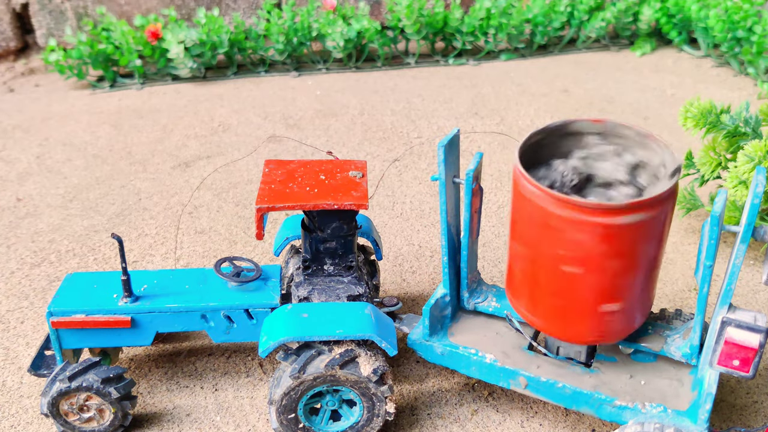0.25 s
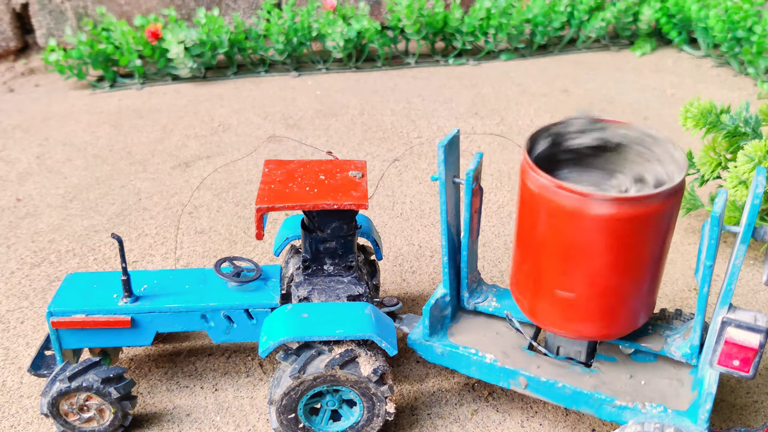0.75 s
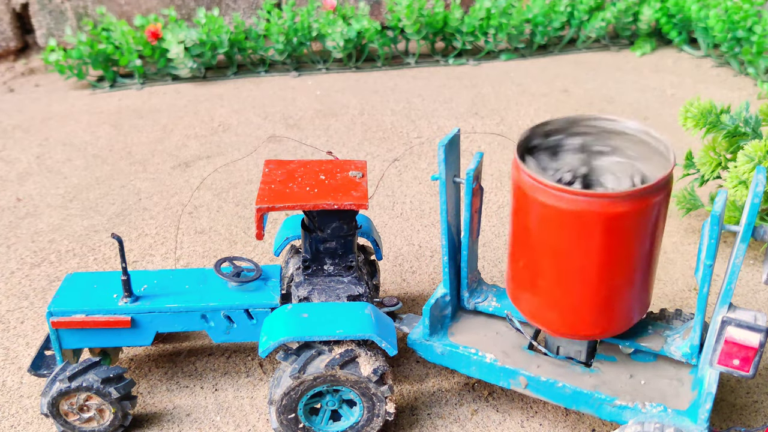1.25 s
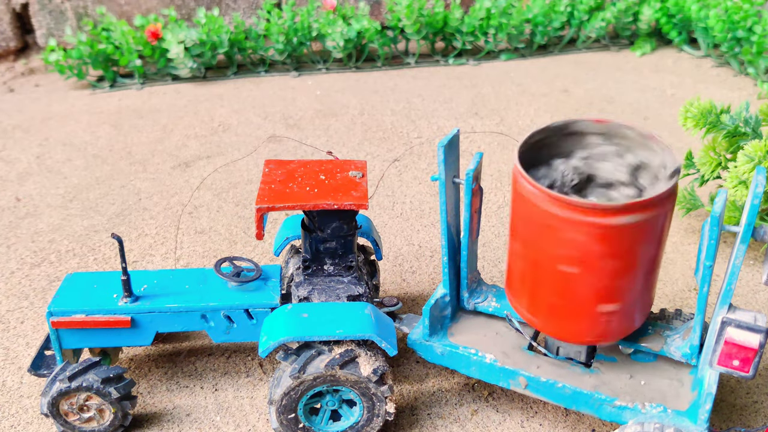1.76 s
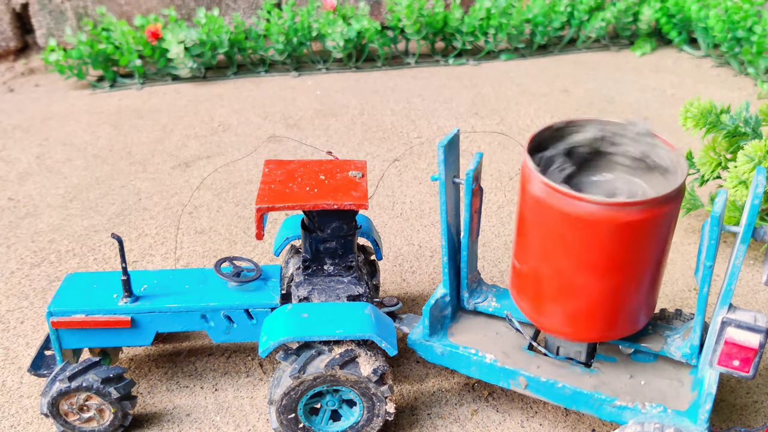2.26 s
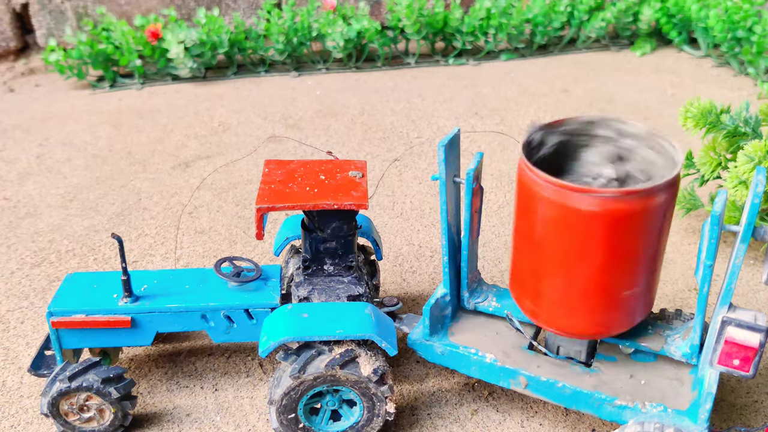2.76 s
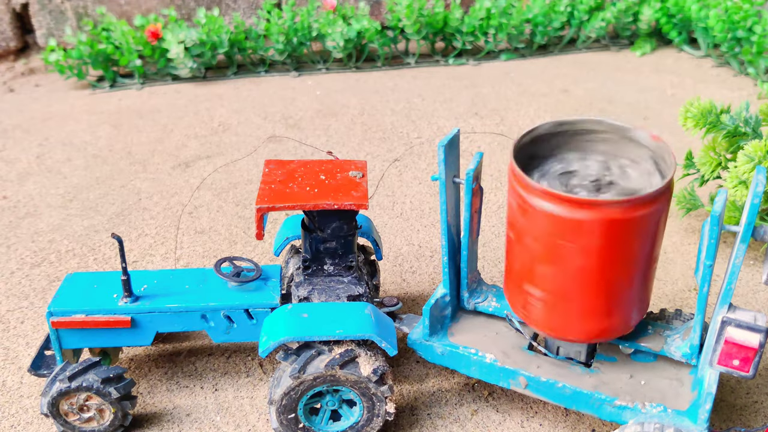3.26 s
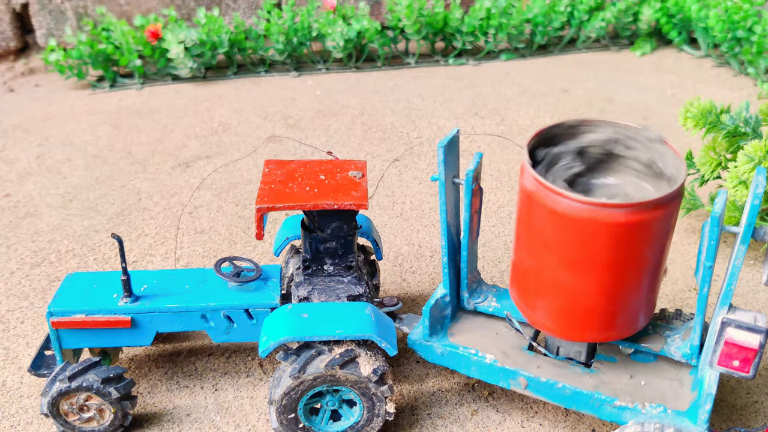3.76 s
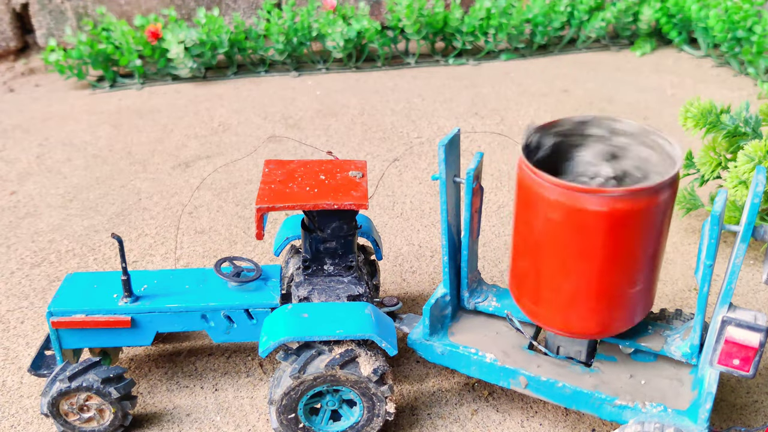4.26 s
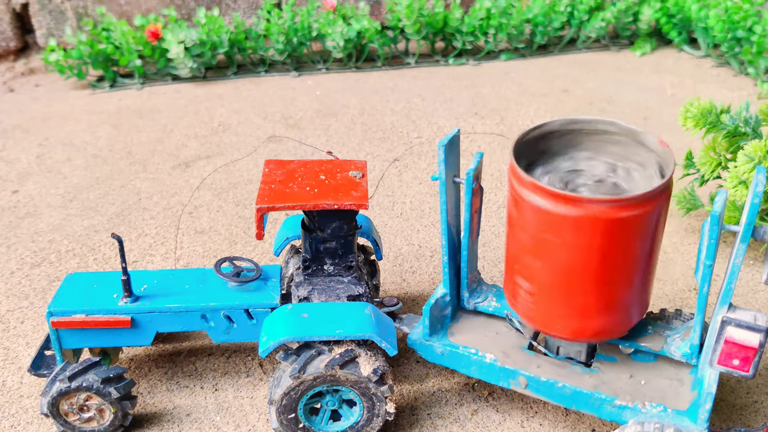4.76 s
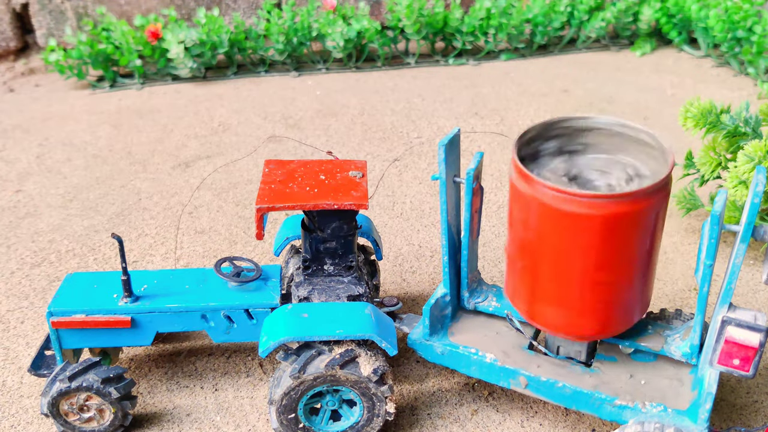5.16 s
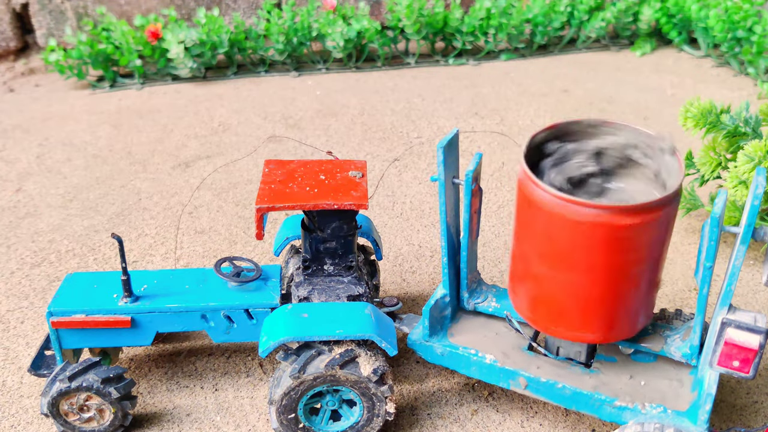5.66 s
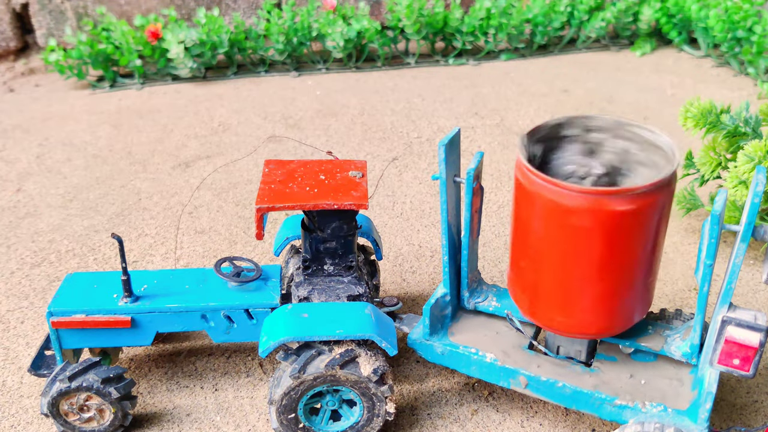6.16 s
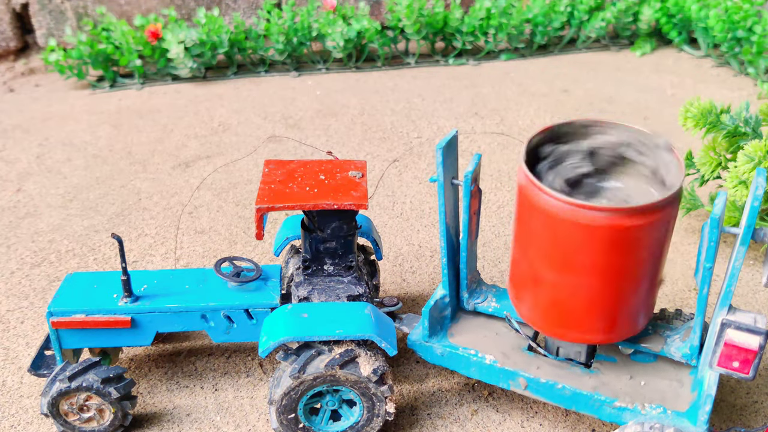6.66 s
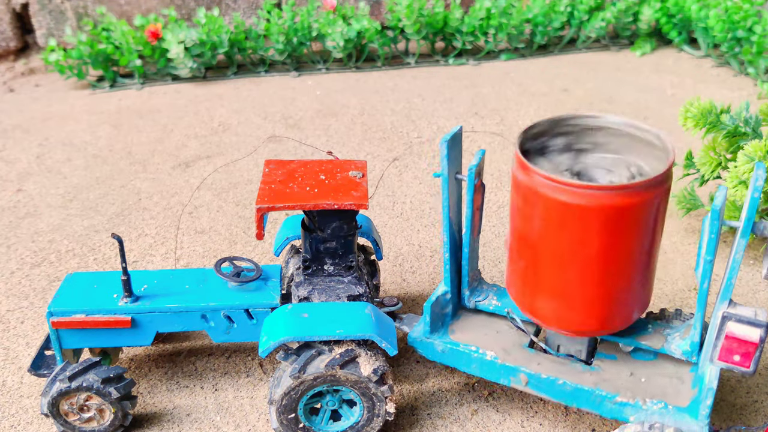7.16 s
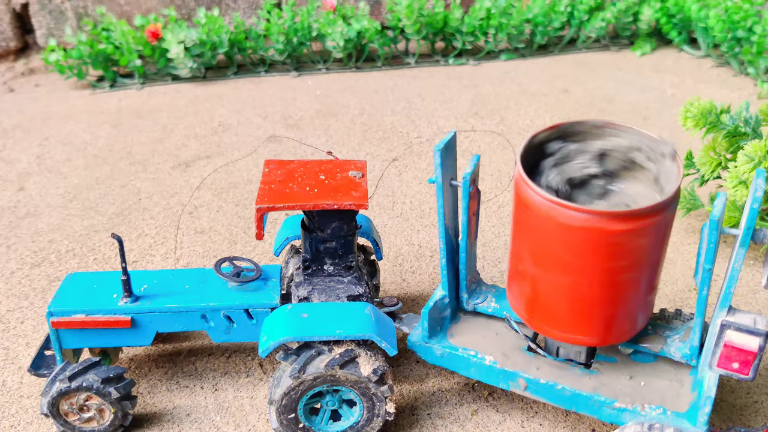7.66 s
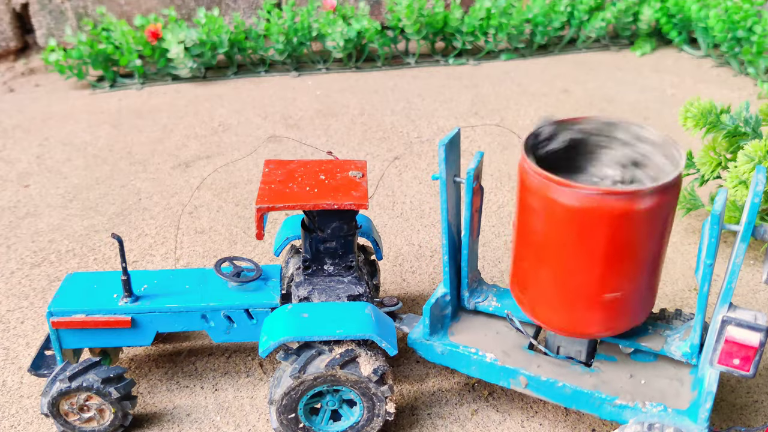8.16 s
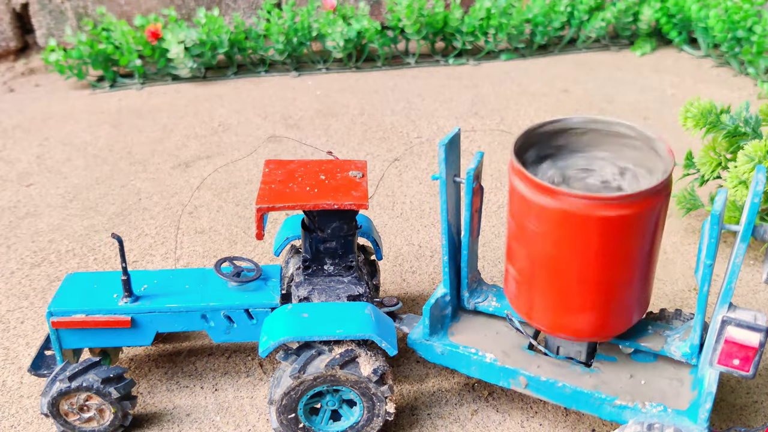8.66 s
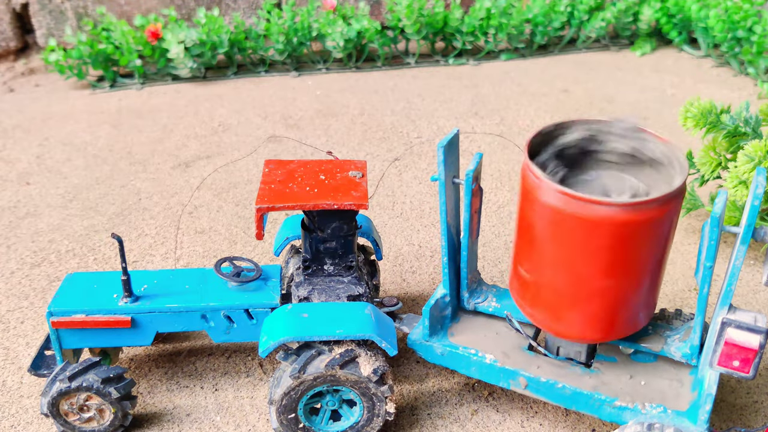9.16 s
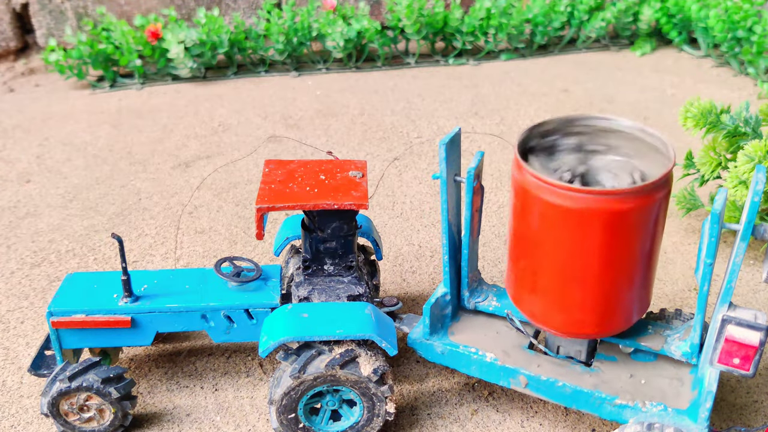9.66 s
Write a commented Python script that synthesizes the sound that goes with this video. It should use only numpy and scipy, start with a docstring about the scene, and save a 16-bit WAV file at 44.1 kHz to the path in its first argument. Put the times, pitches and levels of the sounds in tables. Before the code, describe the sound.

Continuous fast clatter from a small motor-driven metal drum carrying wet concrete. Low knocks come in a lopsided, nearly regular rhythm, with hollow clanks and gear ticks between them, over rough noisy grinding and a low frame shudder. Occasional dry slaps and tiny grit ticks stand out. The opening is loud and slightly overloaded, then the rattle eases a little and keeps going. Close, dry, outdoor sound with dulled treble.

```python
"""Outdoors on sand, a miniature concrete mixer runs close to one microphone.
Its heavy drum wobbles on a loose drive: about six times a second it drops on the frame, bounces,
swings back and settles. Each blow is a short noisy force that excites the resonant modes of the parts.
The small motor and the wet mix grind as modulated noise, the frame rocks as low narrow-band noise,
pebbles and sand tick on the rim, the top is dull, and the hardest blows overload the recorder."""
import sys
import numpy as np
from scipy.fft import rfft, irfft, next_fast_len
from scipy.io import wavfile
from scipy.ndimage import uniform_filter1d, map_coordinates

SR = 44100
rng = np.random.default_rng(int(sys.argv[2]) if len(sys.argv) > 2 else 0)


def log_audio(samples):
    """Write samples as a 16-bit WAV file to the path given in sys.argv[1]."""
    # one column per channel
    frames = np.atleast_2d(samples).T
    # limit to full scale, then quantise
    limited = np.clip(frames, -1, 1)
    pcm = np.round(limited * 32767).astype(np.int16)
    wavfile.write(sys.argv[1], SR, pcm)


N = 437472  # length [samples]

# Once in each wobble the drum drops on its axle:
# (time [s], frame thud level [dB], axle crack level [dB])
DROPS = [(0.0467, -19, -17), (0.1945, -22, -24.5), (0.3467, -18, -21.5), (0.5075, -19, -20),
         (0.665, -11.5, -15), (0.818, -12.0, -16.0), (0.9727, -15, -19.5), (1.1345, -15, -14.5),
         (1.2934, -15.5, -23), (1.4524, -23, -26.5), (1.622, -11, -14), (1.7755, -23, -23),
         (1.9451, -12.5, -19), (2.1046, -15.5, -17.5), (2.2609, -16, -20), (2.4199, -17, -17),
         (2.5818, -17, -18), (2.739, -15.5, -22.0), (2.9057, -19.0, -21.5), (3.0742, -16, -26.0),
         (3.248, -17.5, -19.5), (3.4175, -20.5, -22.5), (3.5874, -20.5, -28.5), (3.765, -15, -19.5),
         (3.929, -20, -23), (4.0961, -30.5, -23), (4.2653, -21.5, -28), (4.4292, -16, -22.5),
         (4.5904, -25.5, -28), (4.755, -27, -26), (4.9238, -18.5, -24), (5.0813, -24, -25.5),
         (5.246, -33, -34), (5.412, -17.5, -22.5), (5.5624, -21, -22), (5.7221, -24, -21.5),
         (5.8838, -17, -20), (6.0397, -19.5, -21.5), (6.202, -14.5, -12), (6.3636, -18, -24),
         (6.5251, -17.5, -15.5), (6.6846, -20.5, -21.0), (6.851, -21, -23.5), (7.0106, -16, -25),
         (7.171, -24, -27), (7.3324, -24, -28.5), (7.4958, -21, -29), (7.6527, -27, -25.0),
         (7.8206, -16.0, -25.5), (7.9735, -26, -23.5), (8.1398, -22.5, -19), (8.2999, -17, -24),
         (8.4601, -19, -21), (8.6151, -28.5, -23), (8.7777, -22, -23), (8.9373, -18.0, -19.5),
         (9.0939, -22, -22.0), (9.256, -17.0, -16), (9.4133, -22, -19.5), (9.5714, -21, -44),
         (9.73, -22, -30), (9.893, -15.0, -17)]
# Bounces, back swing and settling after every drop, with the levels for an average drop:
# (delay [s], scatter of the delay [s], frame thud level [dB], drum clank level [dB], gear tick level [dB])
BOUNCES = [(0.017, 0.002, -22, -31.5, -32), (0.03, 0.0042, -28.5, -29.5, -28.5),
           (0.064, 0.004, -30.5, -28.5, -31.5), (0.077, 0.004, -26, -31, -32),
           (0.1, 0.005, -35, -34, -32.5)]
# Single clanks between drum and drive, loud and moderate, each at its own time:
# (time [s], frame thud level [dB], drum clank level [dB], gear tick level [dB])
SINGLE_CLANKS = [(0.118, -20.5, -21, -24), (0.267, -21, -22, -28), (0.378, -33, -24.5, -23.5),
                 (0.411, -17, -23, -45), (0.42, -22, -18, -15.5), (0.432, -32, -25, -21),
                 (0.5253, -25, -21, -20.5), (0.679, -18, -19, -20.0), (0.727, -27, -14.5, -11.5),
                 (0.835, -25, -18.5, -15), (0.889, -14, -10.0, -18.5), (0.928, -22, -22.5, -19),
                 (0.993, -24, -22.5, -26.5), (1.0044, -31.0, -25, -24.0), (1.046, -14.5, -10.5, -15.5),
                 (1.055, -27, -41, -22), (1.076, -33.0, -24, -23.0), (1.154, -24, -21.5, -9.5),
                 (1.207, -22, -18, -16.0), (1.234, -22, -29, -30.5), (1.31, -34, -21.5, -28),
                 (1.357, -20, -18, -29), (1.391, -36.5, -31, -20), (1.3989, -41, -45, -21),
                 (1.529, -25, -19, -25.0), (1.638, -24.5, -20, -14.5), (1.695, -25, -13.5, -24.5),
                 (1.728, -19, -20.5, -17.5), (1.851, -20, -21, -23), (1.961, -31, -21, -21),
                 (2.123, -23, -17, -13), (2.138, -24, -29.0, -20.5), (2.189, -26, -25, -24),
                 (2.2055, -21, -18, -19), (2.278, -23, -21, -18), (2.333, -18.5, -17, -20),
                 (2.348, -28, -23.5, -19), (2.4514, -26, -26, -20), (2.499, -20, -16, -22.5),
                 (2.528, -24.0, -21.5, -22), (2.599, -18, -20, -12.5), (2.659, -13.5, -22, -14.5),
                 (2.6732, -34.0, -30, -19), (2.7677, -30, -24.5, -21.0), (2.82, -16.5, -19, -32),
                 (2.859, -19, -19, -15.0), (2.924, -24, -20, -24), (3.005, -22.5, -22, -20.5),
                 (3.089, -28.5, -22, -23.5), (3.268, -19.5, -21, -13.5), (3.327, -18, -17, -13),
                 (3.439, -23, -25, -17), (3.711, -21, -23, -28.5), (3.833, -21, -25.5, -19.5),
                 (3.8461, -35.5, -32, -23.5), (3.9595, -27, -28.5, -23.0), (4.213, -50, -44.0, -26),
                 (4.4576, -25, -23, -23.5), (4.504, -20.5, -21, -24), (4.6525, -29, -22, -32.0),
                 (4.669, -26, -22.5, -26.5), (4.854, -33, -27, -18.0), (4.952, -29.0, -25.0, -23.5),
                 (4.981, -30, -23, -29), (4.997, -26.0, -16.5, -23), (5.011, -34, -39, -18.5),
                 (5.11, -28, -30, -23.5), (5.1595, -21, -28, -22), (5.174, -37.0, -25.5, -18.5),
                 (5.331, -25, -23, -20.5), (5.3466, -22, -31, -23.0), (5.43, -17.5, -23.0, -17),
                 (5.446, -30.0, -24, -19.5), (5.651, -23, -29, -17.0), (5.799, -18, -19, -19),
                 (5.813, -34, -32, -17.0), (5.915, -24, -21, -18.0), (5.982, -21.5, -24.5, -24.5),
                 (6.117, -16, -18, -16.5), (6.217, -28.5, -23, -13), (6.2322, -22.5, -38.5, -25),
                 (6.277, -24, -17, -23), (6.392, -22, -29, -20.5), (6.546, -31, -23, -19.5),
                 (6.5582, -27, -25, -23), (6.723, -30, -24, -15.5), (6.7736, -30.5, -24.5, -29.5),
                 (6.872, -19, -18, -13), (7.027, -23, -19.5, -12.5), (7.1008, -34.0, -22, -26),
                 (7.112, -20.0, -20.0, -23.0), (7.289, -20, -21.5, -23), (7.834, -24, -23, -22.5),
                 (7.887, -21.5, -20.5, -29.5), (8.16, -27, -19, -14.5), (8.171, -22, -19, -11.5),
                 (8.327, -27, -26, -23.5), (8.478, -27, -20.5, -24), (8.491, -31, -27, -19.5),
                 (8.518, -27, -19.5, -16.5), (8.68, -36, -20, -24.5), (8.7954, -30, -22.0, -25),
                 (8.808, -27, -28, -22.5), (8.832, -28, -26, -25), (8.956, -26.5, -23, -26.0),
                 (8.967, -32, -19, -24.0), (9.0064, -29, -26, -25), (9.0325, -24.5, -22, -28),
                 (9.074, -34, -42, -24.5), (9.123, -25.5, -20.5, -17.5), (9.1606, -34.5, -32.0, -26),
                 (9.2749, -23.5, -23.5, -20.5), (9.359, -28, -28, -24.5), (9.444, -19, -29, -16.5),
                 (9.615, -36, -24, -37), (9.651, -32.5, -23.5, -20.0), (9.6666, -33, -22.5, -27.0),
                 (9.75, -44, -29, -17.0), (9.809, -30, -28, -23.5), (9.836, -43, -19.5, -25.5)]
# A loose bracket slaps: (time [s], level [dB])
BRACKET_SLAPS = [(0.255, -19.5), (0.666, -12), (1.776, -21), (2.619, -20), (3.449, -20), (3.806, -17),
                 (4.295, -24.5), (4.489, -14.5), (4.99, -22), (5.602, -21), (6.062, -27), (6.364, -22),
                 (6.885, -19.5), (7.211, -24.5), (7.372, -21.5), (7.529, -20), (7.686, -22), (8.014, -23.5),
                 (8.333, -22.5), (9.288, -21.5), (9.303, -19.5), (9.455, -18), (9.761, -21.5)]
# Small stones of the mix flick against the rim: (time [s], level before a common trim [dB])
PEBBLES = [(0.1757, -17.5), (0.3385, -19.5), (0.893, -15), (1.39, -15), (3.741, -19), (3.7653, -24),
           (5.2033, -23), (5.7999, -19.5), (6.745, -16.5), (7.2482, -24), (7.4335, -19), (8.7633, -23.5),
           (9.7072, -21)]

# Resonant modes of each part, typical values that scatter from blow to blow:
# (frequency [Hz], bandwidth [Hz], relative level [dB])
FRAME_MODES = [(53.6, 40, -4), (112.8, 40.2, 2.5), (234, 65, -3), (530, 320, -14.5)]
AXLE_MODES = [(962, 124, 17), (1124, 220, 0), (1690, 270, 4.5), (2010, 220, 5), (2980, 390, -13),
              (6070, 1500, -7)]
DRUM_MODES = [(562, 240, -15.5), (888, 160, -5.5), (1096, 101, 0), (1212, 67, -17), (2080, 810, -22)]
GEAR_MODES = [(3056, 180, -5.5), (3425, 167, 5), (3690, 270, -5), (4324, 266, -6.5), (4450, 1900, -6.5),
              (6320, 600, -2), (6600, 190, -33)]
BRACKET_MODES = [(1150, 110, -2.5), (1685, 120, -7.5), (1975, 200, 0.5), (2200, 290, -5)]
RIM_MODES = [(4500, 390, 0), (6760, 310, -21), (8600, 720, 4), (9900, 1300, 9.5), (12600, 2100, 8.5),
             (14200, 2800, -12)]

# Spectrum of the gears and mix rubbing: (frequency [Hz], relative level per hertz [dB])
GRIND_SPECTRUM = [(60, 11.5), (140, 15), (300, -2.5), (600, -6), (1100, -2.5), (1500, -6), (2500, -3.5),
                  (3400, -0.5), (5300, -3), (6800, -1.5), (8500, 0), (15500, -5)]
# Spectrum of the frame's rocking: (frequency [Hz], relative level per hertz [dB])
ROCKING_SPECTRUM = [(10, -35), (24, -14), (37, -1), (47, 2.5), (62, -5), (90, -15.5), (170, -19),
                    (400, -70)]
# Treble rolloff of the whole sound, dull above about 7 kHz: (frequency [Hz], gain [dB])
TREBLE_ROLLOFF = [(7100, 1), (7900, -11), (10000, -15.5), (15500, -13.5)]

BOUNCE_FOLLOWS = 0.52  # dB more in the bounces for each dB of a harder drop
# bounces differ in force, and in how it divides between the parts
FORCE_SCATTER_DB, ANGLE_SCATTER_DB = 1.24, 2.5
BOUNCE_CEILING_DB = -23  # no part sounds louder than this in a bounce
# the drum swings free before a single clank and recoils after it: no bounces then
FLIGHT_S, RECOIL_S = 0.019, 0.01
CLANK_LINGER, BOUNCE_LINGER = 0.94, 1.65  # factors on the chatter time: bounces rub longer
SLAP_TICK_DB = -13  # the gears tick along, at this level relative to the slap
ROCK_DB, ROCK_FOLLOWS = -27, 0.22  # base level, and its dB for each dB of harder drops
ROCK_PULSE, ROCK_WANDER_DB = 0.25, 1.5  # exponent of the swell with each shake, and slow wander
GRIND_DB = -29  # overall rms level of gears and mix
SAND_DB, SAND_SCATTER_DB = -29.5, 3  # mean level of the grains and its spread
TOP_HZ, OVERLOAD = 15650, 0.74  # upper band limit [Hz] and saturation amplitude


def amp(db):
    """Level to linear gain: 20 dB is a factor of ten in amplitude."""
    return 10 ** (np.asarray(db) / 20)


def unit(x):
    """Normalisation to an rms amplitude of 1."""
    return x / np.sqrt(np.mean(x ** 2) + 1e-20)


def wobble(rate):
    """Slow random modulation: a spline through independent values, rate of them a second."""
    knots = rng.standard_normal(int(N * rate / SR) + 4)
    return map_coordinates(knots, [np.arange(N) * rate / SR])


def envelope(x, size):
    """Short-time amplitude: the running rms over size samples."""
    return np.sqrt(np.abs(uniform_filter1d(x ** 2, size)) + 1e-12)


def filtered(x, response):
    """Linear filtering: the spectrum is multiplied by a response of frequency."""
    m = next_fast_len(N + SR // 2)
    hz = np.fft.rfftfreq(m, 1 / SR)
    return irfft(rfft(x, m) * response(hz), m)[:N]


def coloured(x, spectrum):
    """Spectral shaping through (Hz, dB) points, interpolated on a logarithmic frequency axis."""
    f, db = np.transpose(spectrum)
    return filtered(x, lambda hz: amp(np.interp(np.log(hz + 1), np.log(f), db)))


def placed(times, sounds):
    """Superposition of short sounds, one per row, each starting at its time."""
    start = np.round(np.maximum(times, 0) * SR).astype(int)
    at = start[:, None] + np.arange(sounds.shape[1])
    return np.bincount(at.ravel(), sounds.ravel(), N)[:N]


def strike(times, levels_db, modes, chatter_s, chatter_db, scrape_db, soft_hz, size=2048):
    """Forced resonance: a contact force excites modes; levels are rms over 10 ms from each time."""
    count, lead = len(times), SR // 100  # the window opens 10 ms before the hit
    t, hz = (np.arange(size) - lead) / SR, np.fft.rfftfreq(size, 1 / SR)

    # the surfaces scrape as they meet, hit once, chatter briefly and slide apart
    chatter_length = chatter_s * amp(3 * rng.standard_normal((count, 1)))
    chatter = np.exp(np.minimum(t / 0.00033, -t / chatter_length))
    scrape = amp(scrape_db) * np.exp(np.minimum(t / 0.0046, -t / 0.016))
    force = (chatter + scrape) * rng.laplace(size=(count, size))
    # chatter_db: energy of the rough force relative to the single hit
    force *= amp(chatter_db) / np.linalg.norm(force, axis=1, keepdims=True)
    force[:, lead] += 1

    # the point of contact and the load shift, so the modes answer a little differently each time
    body = 0
    for centre, width, db in modes:
        pitch, strength = rng.standard_normal((count, 2)).T[:, :, None]
        pole = (centre + 0.2 * width * pitch) ** 2 - hz ** 2 + 1j * hz * width
        body = body + amp(db + 2.5 * strength) * (1j * hz * width) / pole

    # a part radiates little below its lowest mode, and a soft contact carries little treble
    slope = 1j * hz / (0.58 * modes[0][0])
    radiation = slope ** 2 / (1 + np.sqrt(2) * slope + slope ** 2)
    softness = 1 / (1 + 1j * hz / soft_hz) ** 2
    blows = irfft(rfft(force) * body * (radiation * softness), size)

    rms = np.sqrt(np.mean(blows[:, lead:2 * lead] ** 2, axis=1))
    gain = amp(levels_db) / rms
    return placed(times - lead / SR, blows * gain[:, None])


def knocks():
    """Soft impact: the drum's weight pushes a deep thud from the frame, with a dull crack of the axle."""
    s, thud_db, crack_db = np.transpose(DROPS)
    frame = strike(s, thud_db, FRAME_MODES, chatter_s=0.011, chatter_db=0.5, scrape_db=-10.5,
                   soft_hz=540, size=4096)
    axle = strike(s, crack_db, AXLE_MODES, chatter_s=0.0039, chatter_db=13, scrape_db=-19, soft_hz=16000)
    return frame + axle


def clanks(rows, linger):
    """Shared excitation: metal contacts ring drum and gears and jolt the frame; linger draws out chatter."""
    s, thud_db, clank_db, tick_db = np.transpose(rows)
    frame = strike(s, thud_db, FRAME_MODES, chatter_s=0.0028 * linger, chatter_db=4.5, scrape_db=-4,
                   soft_hz=1490, size=4096)
    drum = strike(s, clank_db, DRUM_MODES, chatter_s=0.0014 * linger, chatter_db=13, scrape_db=-16.5,
                  soft_hz=4170)
    gears = strike(s, tick_db, GEAR_MODES, chatter_s=0.0015 * linger, chatter_db=16, scrape_db=-22.5,
                   soft_hz=18700)
    return frame + drum + gears


def bounces():
    """Repeated impact: light contacts after each drop, as rows of (s, thud dB, clank dB, tick dB)."""
    drop_s, drop_db, _ = np.transpose(DROPS)[:, :, None]
    delay, scatter, *part_db = np.transpose(BOUNCES)
    draws = rng.standard_normal((len(DROPS), len(BOUNCES), 5))
    timing, force, *angle = np.moveaxis(draws, 2, 0)
    s = drop_s + delay + scatter * timing
    force_db = BOUNCE_FOLLOWS * (drop_db - drop_db.mean()) + FORCE_SCATTER_DB * force

    since_clank = s[..., None] - np.transpose(SINGLE_CLANKS)[0]
    crowded = ((since_clank > -FLIGHT_S) & (since_clank < RECOIL_S)).any(axis=-1)
    force_db = np.where(crowded, -120, force_db)  # practically silent

    levels = []
    for db, own in zip(part_db, angle):
        level_db = db + force_db + ANGLE_SCATTER_DB * own
        levels.append(np.minimum(level_db, BOUNCE_CEILING_DB))
    return np.stack([s, *levels], axis=-1).reshape(s.size, -1)


def clacks():
    """Coupled impact: the loose bracket slaps with a dry, hollow note and shakes the gears."""
    s, slap_db = np.transpose(BRACKET_SLAPS)
    bracket = strike(s, slap_db, BRACKET_MODES, chatter_s=0.0011, chatter_db=1, scrape_db=-15.5,
                     soft_hz=3840)
    gears = strike(s, slap_db + SLAP_TICK_DB, GEAR_MODES, chatter_s=0.00086, chatter_db=9, scrape_db=-33,
                   soft_hz=14000)
    return bracket + gears


def pebbles():
    """Hard impact on a thin shell: stones thrown up by the mix tick brightly on the rim."""
    s, db = np.transpose(PEBBLES)
    return strike(s, db - 0.5, RIM_MODES, chatter_s=0.00078, chatter_db=21, scrape_db=-16.5, soft_hz=19000)


def vigour_db():
    """Smoothed excitation: how much harder than average the drops are within half a second around."""
    s, thud_db, _ = np.transpose(DROPS)
    relative_db = np.interp(np.arange(N) / SR, s, thud_db - thud_db.mean())
    return uniform_filter1d(relative_db, size=SR // 2)


def rocking(shaking):
    """Low-frequency vibration: the frame shudders on its wheels, swelling as the drum is shaken."""
    shudder = coloured(rng.standard_normal(N), ROCKING_SPECTRUM)
    even_swing = shudder / envelope(shudder, size=2800)
    level_db = ROCK_DB + ROCK_FOLLOWS * vigour_db() + ROCK_WANDER_DB * wobble(6)
    return amp(level_db) * unit(shaking ** ROCK_PULSE * even_swing)


def grinding(shaking, grit_db, flutter_db, surge_db, load_share):
    """Friction noise: motor gears and sandy mix rub in dense grains, harder while the drum is shaken."""
    grains = rng.standard_normal(N) * amp(grit_db * wobble(2500))
    unevenness = amp(flutter_db * wobble(160) + surge_db * wobble(25))
    load = (shaking + 0.6) ** load_share * unevenness
    return amp(GRIND_DB) * unit(load * coloured(grains, GRIND_SPECTRUM))


def sand(count):
    """Random impacts: smaller grains patter on the rim at independent, uniformly spread moments."""
    s = rng.uniform(0, N / SR, count)
    db = SAND_DB + SAND_SCATTER_DB * rng.standard_normal(count)
    return strike(s, db, RIM_MODES, chatter_s=0.0007, chatter_db=11, scrape_db=-19, soft_hz=19000)


def scene():
    """Superposition in open air: the mixer's sounds add up with no echo."""
    single = clanks(SINGLE_CLANKS, linger=CLANK_LINGER)
    light = clanks(bounces(), linger=BOUNCE_LINGER)
    rattle = knocks() + single + light + clacks()
    shaking = unit(envelope(rattle, size=3000))
    rock = rocking(shaking)
    grind = grinding(shaking, grit_db=4.5, flutter_db=2.5, surge_db=2.24, load_share=0.14)
    return (rattle + pebbles() + rock + grind + sand(count=70))[None]


def record(dry):
    """Saturation and band limiting: the treble is dulled, tall peaks flatten, and the top is cut off."""
    x = coloured(dry[0], TREBLE_ROLLOFF)
    x = x / (1 + np.abs(x / OVERLOAD) ** 7) ** (1 / 7)
    return filtered(x, lambda hz: hz < TOP_HZ)[None]


dry = scene()
out = record(dry)
log_audio(out)
```